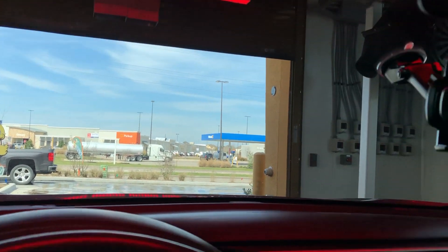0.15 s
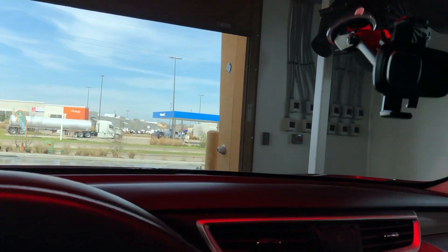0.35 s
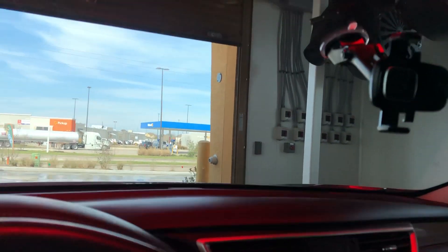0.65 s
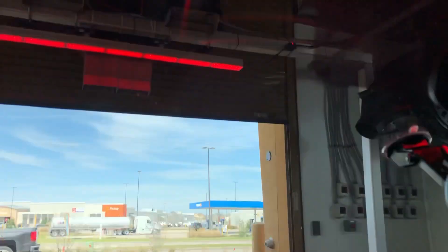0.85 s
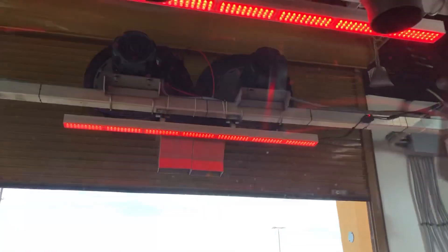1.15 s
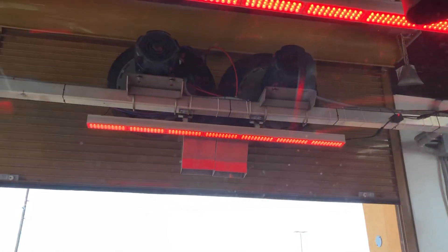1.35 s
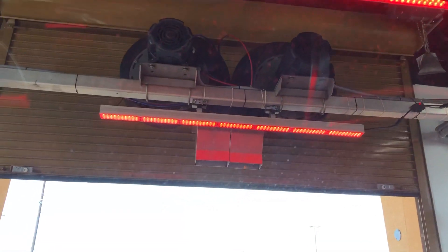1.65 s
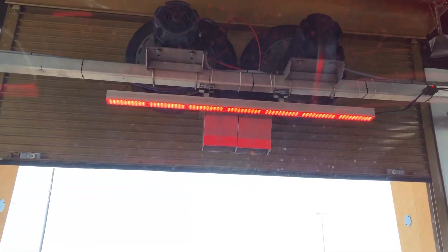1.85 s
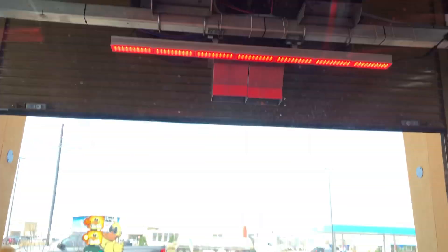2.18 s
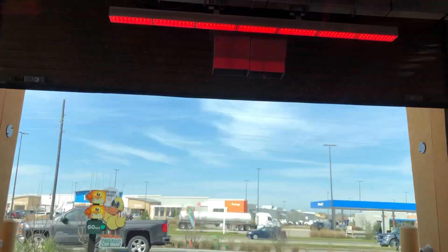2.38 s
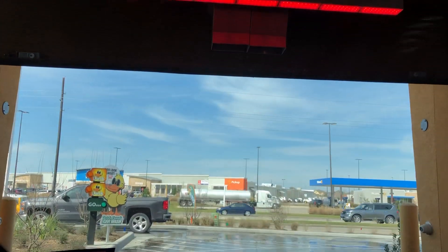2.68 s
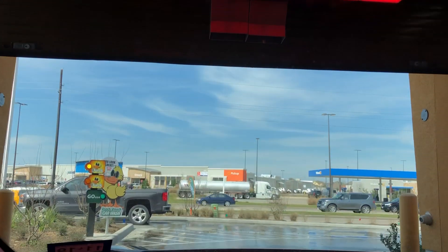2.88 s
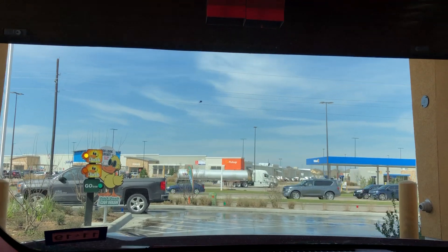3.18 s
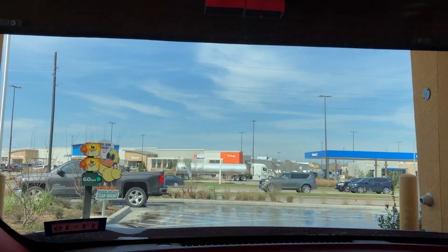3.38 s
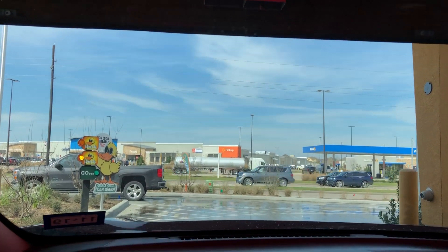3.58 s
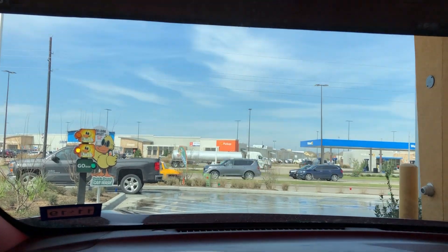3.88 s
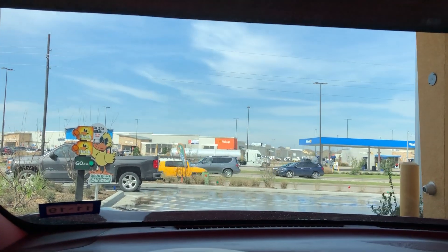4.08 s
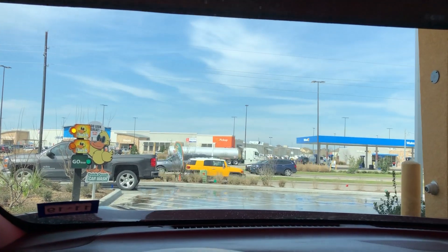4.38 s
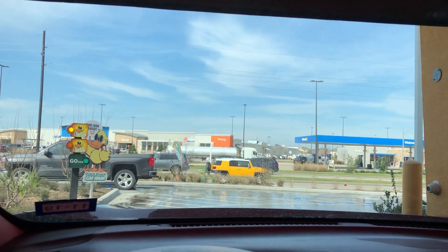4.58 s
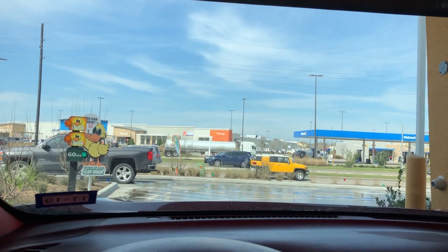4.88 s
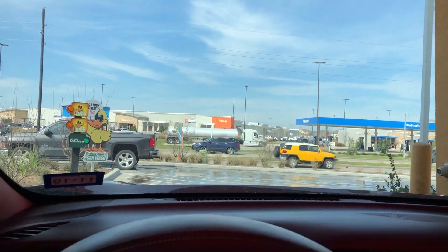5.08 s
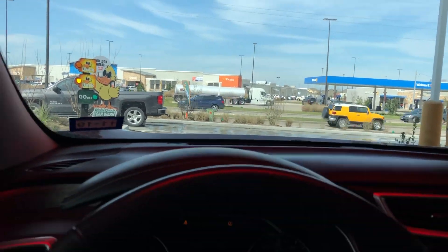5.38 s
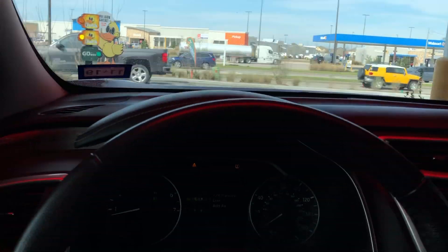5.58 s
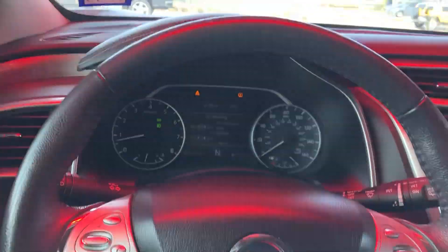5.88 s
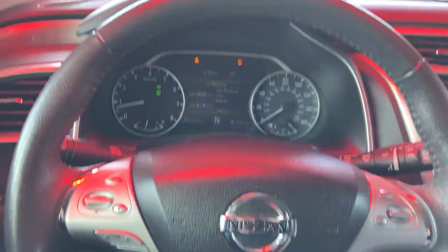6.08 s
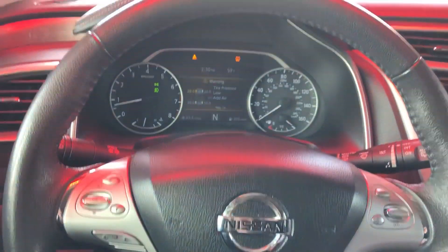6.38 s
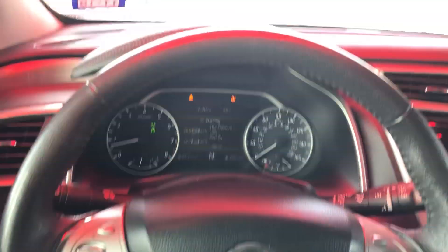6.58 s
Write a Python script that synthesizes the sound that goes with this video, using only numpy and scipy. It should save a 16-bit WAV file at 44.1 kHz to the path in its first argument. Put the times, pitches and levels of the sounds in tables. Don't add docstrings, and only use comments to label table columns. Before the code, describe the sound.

Heard from a hand-held microphone inside a closed car in a wash bay, powerful air blowers roar without pause. The sound is dense and bass-heavy, gusts booming in the cabin and a roof panel shuddering. A thin fan tone wavers within it. Tiny handling rustles pass early, and close to the end a crisp plastic tick is followed by a faint airy whistle.

```python
import sys
import numpy as np
from scipy import signal
from scipy.fft import rfft, irfft, next_fast_len
from scipy.io import wavfile
from scipy.ndimage import uniform_filter1d, minimum_filter1d

SR = 44100
rng = np.random.default_rng(int(sys.argv[2]) if len(sys.argv) > 2 else 0)


def makeup_ratio(level_db):
    decades = np.asarray(level_db, float) / 20
    return 10 ** decades


def log_audio(samples):
    frames = np.atleast_2d(samples).T
    limited = np.clip(frames, -1, 1)
    pcm = np.round(limited * 32767).astype(np.int16)
    wavfile.write(sys.argv[1], SR, pcm)


N = 297539

# time in seconds, level in dB.
JET = [
    (0.0, -42.5),
    (0.34, -44.5),
    (1.41, -41.5),
    (2.91, -39.5),
    (3.51, -40.5),
    (6.18, -41.5),
    (6.46, -42.5),
    (6.74, -41.5),
]


def rms_one(x):
    return x / np.sqrt(np.mean(x ** 2) + 1e-20)


def in_time(rows):
    s, *columns = np.transpose(rows)
    return [np.interp(np.arange(N) / SR, s, column) for column in columns]


def jet_swing_db():
    jet_db, = in_time(JET)
    return jet_db - jet_db.mean()


def drift(rate):
    r = np.exp(-80 * np.pi * rate / SR)
    draws = rng.standard_normal(N // 40 + 2002)
    slow = signal.lfilter([1], [1, -2 * r, r * r], draws)[2000:]
    return np.interp(np.arange(N) / 40, np.arange(len(slow)), rms_one(slow))


def resonant_noise(hz, width_hz, even=0.0):
    r = np.exp(-np.pi * width_hz / SR)
    draws = rng.standard_normal((2, N + SR))
    sway = signal.lfilter([1], [1, -2 * r, r * r], draws[0] + 1j * draws[1])[SR:]
    sway = sway / np.sqrt(np.mean(np.abs(sway) ** 2))
    swell = uniform_filter1d(np.abs(sway) ** 2, size=SR // 12) + 0.044
    carrier = np.exp(2j * np.pi * np.cumsum(hz * np.ones(N)) / SR)
    return rms_one((sway * carrier).real / swell ** (np.clip(even, 0, 1) / 2))


def swells(rows, rise_db_per_s, fall_db_per_s, calm_db):
    t = np.arange(0, N + 64, 64) / SR
    level_db = calm_db
    for s, peak_db, hold in rows:
        climb_db = rise_db_per_s * np.maximum(s - t, 0)
        sink_db = fall_db_per_s * np.maximum(t - s - hold, 0)
        level_db = np.maximum(level_db, peak_db - climb_db - sink_db)
    return np.interp(np.arange(N) / SR, t, level_db)


def air():
    # frequency in Hz, level in dB per Hz.
    low_colour = [(25, -27.5), (33, -12.5), (45, 1.5), (62, 1.5), (85, 1.5), (105, 7.5), (145, 6), (185, 3),
                  (215, 0), (255, -2.5), (285, 1), (375, -0.5), (425, -2.5), (460, -1.5)]
    high_colour = [(540, -8.5), (620, -10), (700, -15.5), (800, -16.5), (1040, -22.5), (1450, -25),
                   (1850, -32), (2400, -33), (4000, -40.5), (5400, -44), (8000, -53), (11200, -66),
                   (14000, -69), (17500, -73)]
    splits_hz = (150, 650, 2500)
    # share of the jet's swing as a ratio, slow swell in dB.
    ranges = [
        (0.2, -0.3),
        (0.6, 0.56),
        (0.7, 0.24),
        (0.99, 0.15),
    ]
    air_db, patchy_db = -14, 0.5

    size = next_fast_len(N)
    hz = np.maximum(np.arange(size // 2 + 1) * SR / size, 1)
    points = np.vstack([[5, -70], low_colour, high_colour])
    colour = makeup_ratio(np.interp(np.log(hz), np.log(points[:, 0]), points[:, 1]))
    coloured = irfft(rfft(rng.standard_normal(size)) * colour, size)
    spectrum = rfft(rms_one(coloured))

    below = [0] + [1 / (1 + (hz / split) ** 4) for split in splits_hz] + [1]
    swing_db = jet_swing_db()
    out = 0
    for k, (share, swell_db) in enumerate(ranges):
        gain_db = air_db + share * swing_db + swell_db * drift(1.3) + patchy_db * drift(19)
        out = out + makeup_ratio(gain_db) * irfft(spectrum * (below[k + 1] - below[k]), size)[:N]
    return out


def cabin_boom():
    # time in seconds, peak in dB, mode frequency in Hz.
    low_gusts = [(0.0, -15, 134), (0.33, -14, 131), (0.58, -8.5, 121), (0.81, -9, 124), (1.01, -10, 124),
                 (1.3, -11.5, 129), (1.57, -7, 131), (1.95, -12.5, 131), (2.09, -9, 131),
                 (2.23, -12.5, 115), (2.64, -18, 131), (3.38, -14, 126), (3.57, -13, 126), (4.08, -17, 133),
                 (4.41, -9, 120), (4.54, -21, 138), (4.92, -11.5, 128), (5.18, -23, 130),
                 (5.54, -15.5, 114), (5.85, -12, 136), (6.14, -12, 128), (6.32, -14.5, 129),
                 (6.55, -11, 131), (6.74, -13, 133)]
    high_gusts = [(0.13, -14, 165.2), (0.49, -12.5, 161), (0.79, -11, 157.7), (1.29, -16, 150.7),
                  (1.57, -10, 157.7), (1.95, -12, 156.5), (2.23, -13, 155.7), (2.46, -15.5, 153),
                  (2.64, -12.5, 163.9), (3.11, -18, 165.6), (3.28, -14.5, 157.2), (3.4, -16, 164),
                  (3.7, -11, 160.4), (3.87, -15.5, 159.2), (4.28, -16.5, 155.2), (4.6, -8.5, 155.5),
                  (4.76, -11.5, 158.6), (4.92, -15, 151), (5.04, -7.5, 162), (5.54, -15.5, 160.1),
                  (5.74, -12.5, 151), (5.87, -17.5, 162), (6.21, -14.5, 159.4), (6.45, -12.5, 157.2),
                  (6.74, -10.5, 158)]
    slope_db_per_s, calm_db, width_hz = 55.5, -20, 17.1

    out = 0
    for gusts, even in ((low_gusts, 0.85), (high_gusts, 0.75)):
        peaks = [(s, db, 0) for s, db, hz in gusts]
        level_db = swells(peaks, slope_db_per_s, slope_db_per_s, calm_db)
        mode_hz = in_time(gusts)[1]
        out = out + makeup_ratio(level_db) * resonant_noise(mode_hz, width_hz, even=even)
    return out


def roof_panel():
    # time in seconds, peak in dB.
    panel_gusts = [(0.0, -13.5), (2.03, -18), (2.29, -16.5), (3.08, -10), (3.42, -13.5), (3.62, -14.5),
                   (3.9, -17.5), (4.24, -13), (4.501, -14), (4.82, -12.5), (5.07, -13), (6.34, -19.5)]
    fade_db_per_s, calm_db = 59.5, -25
    panel_hz, width_hz = 333.1, 25

    peaks = [(s, db, 0) for s, db in panel_gusts]
    level_db = swells(peaks, fade_db_per_s, fade_db_per_s, calm_db)
    return makeup_ratio(level_db - 5.0) * resonant_noise(panel_hz, width_hz, even=1.0)


def blade_tones():
    # time in seconds, peak in dB, hold in seconds.
    first_swells = [(0.81, -34, .17), (1.31, -31.5, .05), (1.46, -37, .01), (1.7, -37, .06),
                    (1.97, -33.5, 0.097), (2.25, -35.5, .03), (2.6, -31.5, .02), (2.74, -38, 0.078),
                    (3.3, -35.5, 0.26), (3.75, -44, .01), (4.1, -39, 0.049), (4.24, -35.5, 0.0088),
                    (4.5, -32.5, 0.063), (4.96, -34, 0.011), (5.61, -36, .01), (5.74, -38, 0.0095),
                    (6.59, -41, 0.0093)]
    second_swells = [(0.05, -43.5, .01), (0.26, -42, .01), (0.64, -40.5, 0.0086), (0.88, -40, 0.18),
                     (1.2, -39, .12), (1.41, -40.5, 0.0084), (1.63, -44, .01), (1.73, -36.5, 0.16),
                     (2.33, -35, 0.011), (2.74, -41, .05), (3.1, -46, .15), (3.4, -40, 0.026),
                     (3.79, -46, 0.011), (4.1, -39.5, .15), (5.25, -41, 0.0091), (5.61, -40.5, 0.011),
                     (6.16, -43, 0.011), (6.4, -49, .3)]
    fade_db_per_s, flutter_db = 109.5, 1.5
    blade_hz, wander_hz = 707.5, 2.0

    phase = 2 * np.pi * np.cumsum(blade_hz + wander_hz * drift(3)) / SR
    first_db = swells(first_swells, fade_db_per_s, fade_db_per_s, -44) + flutter_db * drift(9)
    second_db = swells(second_swells, fade_db_per_s, fade_db_per_s, -58) + flutter_db * drift(12)
    overtones = np.sin(2 * phase) + makeup_ratio(-18) * np.sin(3 * phase) + makeup_ratio(-22) * np.sin(4 * phase)
    return makeup_ratio(first_db + 1.9) * np.sin(phase) + makeup_ratio(second_db - 0.1) * overtones


def shear_ridges():
    # centre in Hz, width in Hz, level in dB.
    ridges = [(2384, 250, -59.5), (5410, 500, -65)]
    growth = 2.5
    hiss = sum(makeup_ratio(level_db) * resonant_noise(hz, width_hz) for hz, width_hz, level_db in ridges)
    return makeup_ratio(growth * jet_swing_db()) * hiss


def seal_whistle():
    # time in seconds, peak in dB, hold in seconds.
    lower_puffs = [
        (5.9, -57, .14),
        (6.075, -45, .07),
        (6.2, -53, .04),
        (6.36, -59, 0.059),
    ]
    upper_puffs = [
        (5.94, -53, .04),
        (6.03, -48, 0.0097),
        (6.09, -45, .056),
        (6.22, -50, .01),
        (6.32, -56, .01),
        (6.38, -49, .01),
        (6.54, -58, .01),
    ]
    # centre in Hz, width in Hz, level in dB.
    lower_tones = [(4101, 30, -5), (4215, 110, -3)]
    upper_tones = [(5770, 70, -15), (6230, 110, -7), (6335, 100, -5), (6574, 120, -11), (8700, 200, -21)]
    fade_db_per_s, calm_db, flutter_db, trim_db = 148, -57, 2.0, -4

    lifted = np.interp(np.arange(N) / SR, [5.86, 5.89, 6.55, 6.7], [0, 1, 1, 0])
    out = 0
    for puffs, tones in ((lower_puffs, lower_tones), (upper_puffs, upper_tones)):
        group_db = swells(puffs, fade_db_per_s, fade_db_per_s, calm_db) + flutter_db * drift(40)
        breath = sum(makeup_ratio(level_db) * resonant_noise(hz, width_hz, even=.2) for hz, width_hz, level_db in tones)
        out = out + makeup_ratio(group_db) * breath
    return makeup_ratio(trim_db) * lifted * out


def trim_ticks():
    # time in seconds, peak in dB.
    tick_rows = np.array([
        (5.8606, -20),
        (6.6684, -53),
    ])
    # frequency in Hz, level in dB, T60 in seconds.
    modes = [(4401, -5.5, .011), (5070, -8.5, 0.0077), (6050, -7.5, .006), (7400, -4.5, 0.004),
             (9400, -2.5, 0.005), (11200, -10.5, .0022), (13200, -3, .0022), (16300, 7, .0009)]
    lag_s = .0007

    out = np.zeros(N)
    starts = ((tick_rows[:, 0] + lag_s) * SR).astype(int)
    spread_db = .5 * rng.standard_normal((len(tick_rows), len(modes)))
    for k, (hz, level_db, t60) in enumerate(modes):
        strike_db = tick_rows[:, 1] + level_db - 2.5 + spread_db[:, k]
        clicks = np.full(N, 1e-18)
        clicks[starts] = makeup_ratio(strike_db) * (-1) ** k
        r = makeup_ratio(-60 / (t60 * SR))
        w = 2 * np.pi * hz / SR
        out += signal.lfilter([0, np.sin(w)], [1, -2 * r * np.cos(w), r * r], clicks)
    return out


def hand_slips():
    # time in seconds, level in dB,
    # length in seconds.
    finger_rows = [
        (.3925, -50, .005),
        (.406, -56, .006),
        (.604, -61, .006),
        (0.615, -71, .005),
        (0.628, -53, 0.0044),
    ]
    palm_rows = [
        (4.545, -62, .02),
        (4.635, -57, .015),
        (4.72, -63, .02),
        (4.802, -58, .015),
        (4.88, -59, .025),
        (6.3, -65, .9),
    ]
    palm_band_hz = (5500, 10500)

    t = np.arange(N) / SR
    out = 0
    for rows, edges_hz, kind in ((finger_rows, 5500, "high"), (palm_rows, palm_band_hz, "band")):
        envelope = sum(makeup_ratio(level_db) * np.exp(-((t - s) / length * 2) ** 2) for s, level_db, length in rows)
        band = signal.butter(2, edges_hz, kind, fs=SR, output="sos")
        out = out + envelope * signal.sosfilt(band, rng.standard_normal(N))
    return out


def scene():
    blowers = air() + cabin_boom() + roof_panel() + blade_tones() + shear_ridges()
    details = seal_whistle() + trim_ticks() + hand_slips()
    return (blowers + details)[None]


def band_limit(x):
    return signal.sosfilt(signal.butter(12, 17250, fs=SR, output="sos"), x)


def record(dry):
    ceiling_db, release_db_per_s, cutoff_hz = -0.3, 250, 18400
    over_db = np.maximum(20 * np.log10(np.abs(dry[0]) + 1e-9) - ceiling_db, 0)
    ramp = release_db_per_s * np.arange(N) / SR
    held_db = np.maximum.accumulate(over_db + ramp) - ramp
    ahead_db = -minimum_filter1d(-held_db, size=221)
    limited = dry * makeup_ratio(-uniform_filter1d(ahead_db, size=111))
    top_cut = signal.cheby2(14, 60, cutoff_hz, fs=SR, output="sos")
    limited = signal.sosfilt(top_cut, limited)
    mix = limited * np.interp(np.arange(N), [N - 220, N], [1, .45])
    return band_limit(mix)


dry = scene()
out = record(dry)
log_audio(out)
```